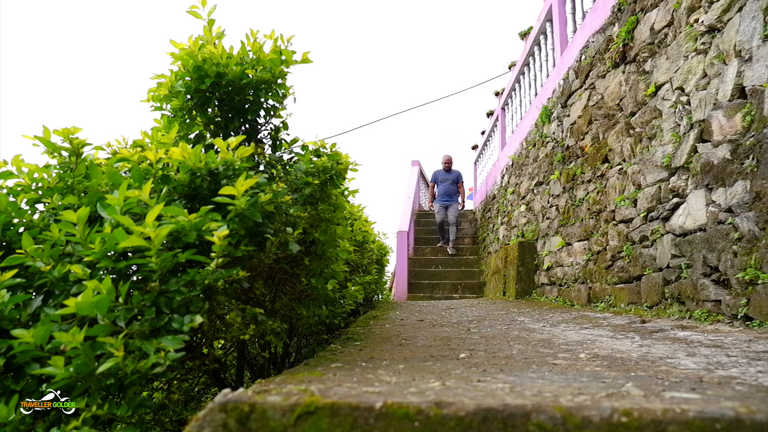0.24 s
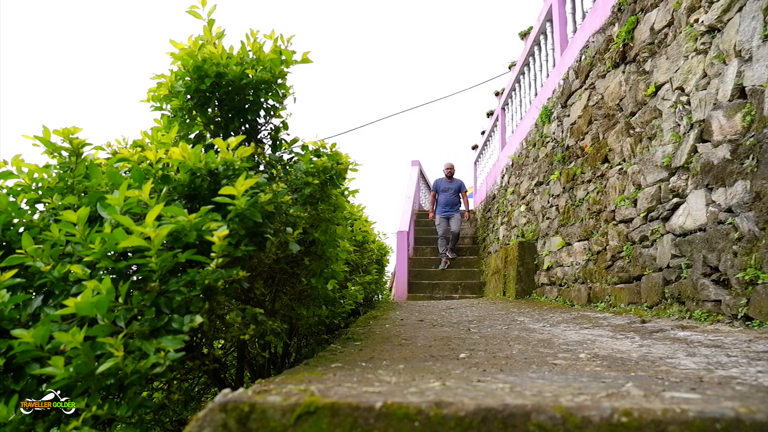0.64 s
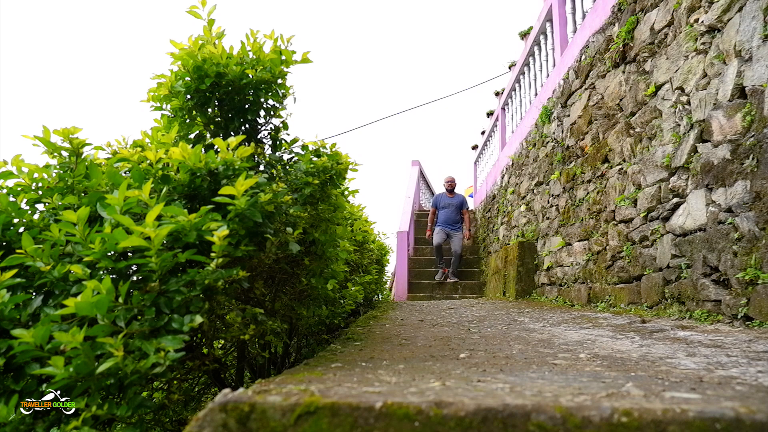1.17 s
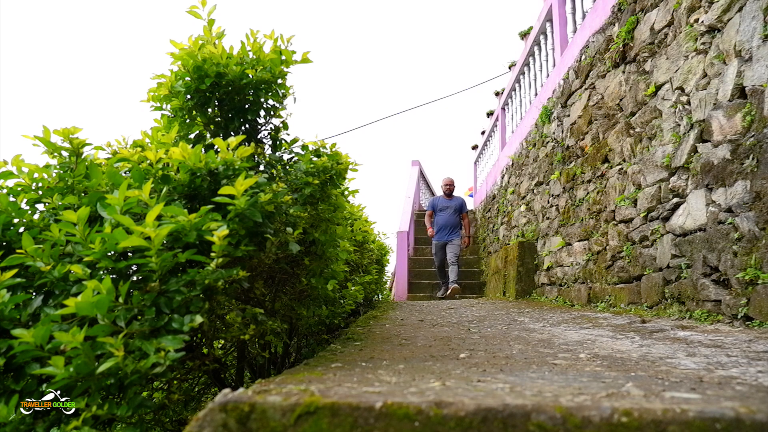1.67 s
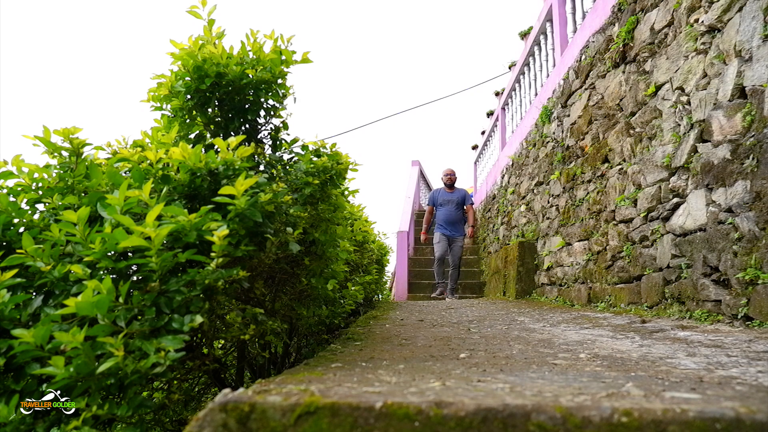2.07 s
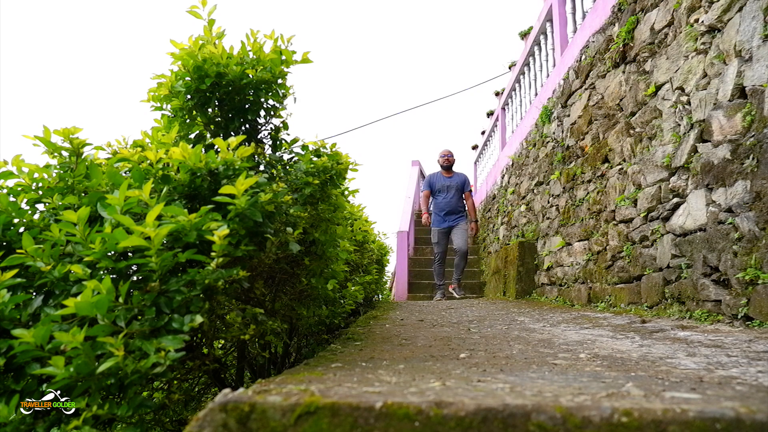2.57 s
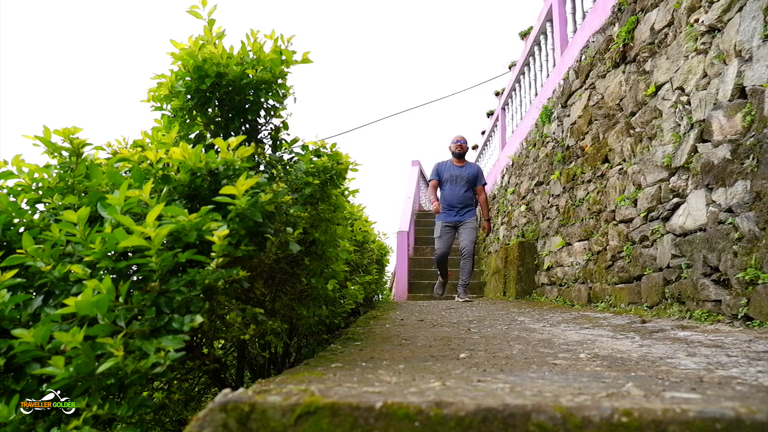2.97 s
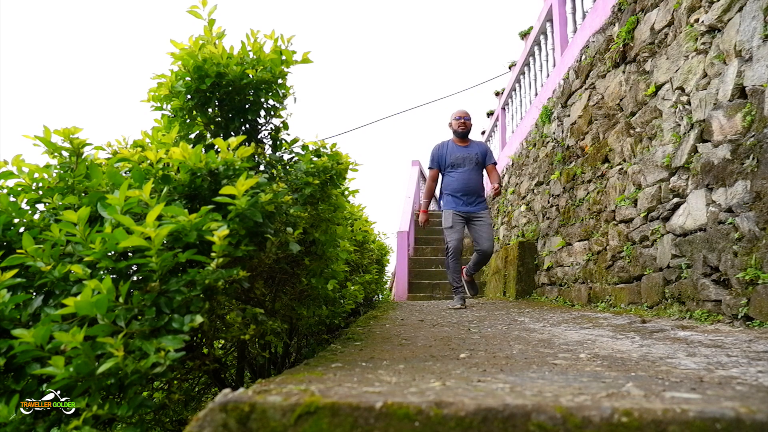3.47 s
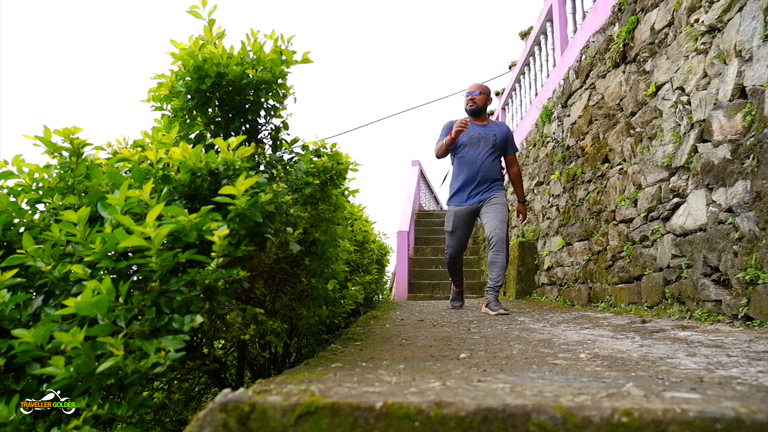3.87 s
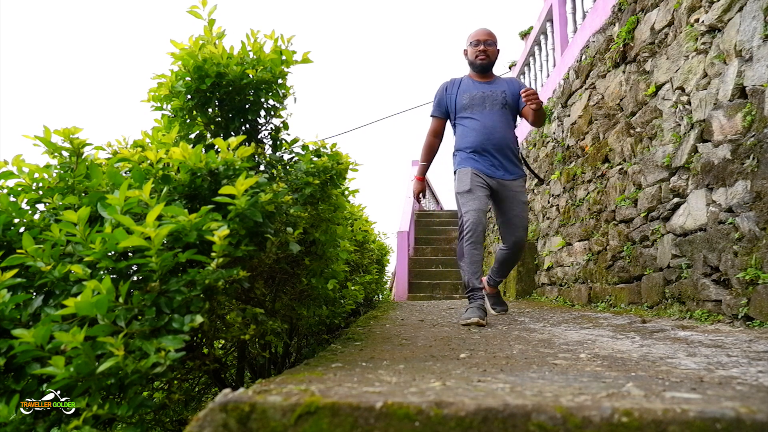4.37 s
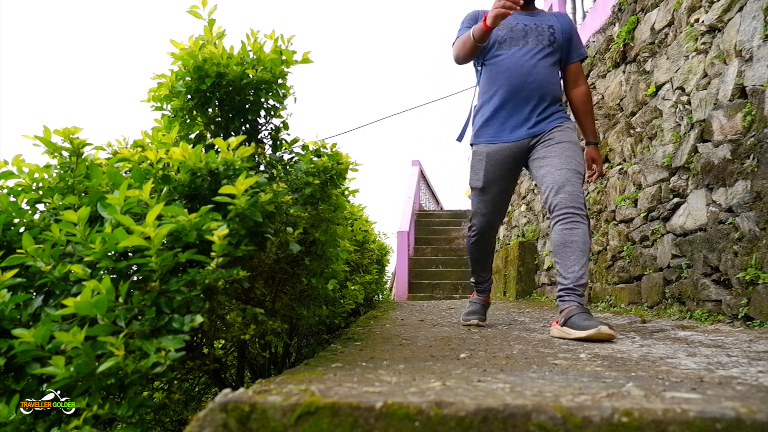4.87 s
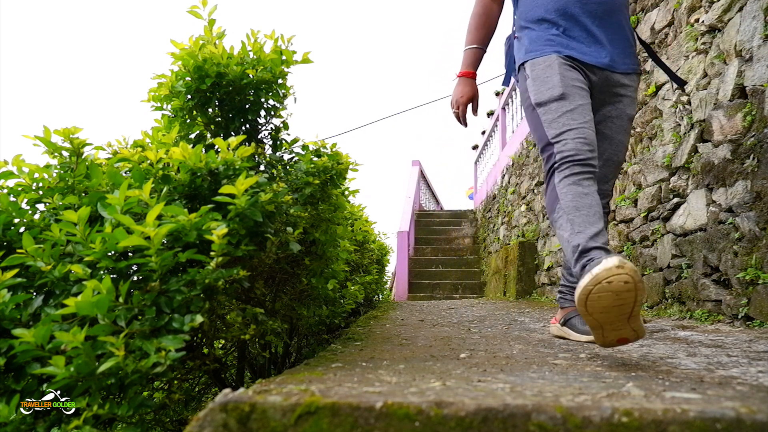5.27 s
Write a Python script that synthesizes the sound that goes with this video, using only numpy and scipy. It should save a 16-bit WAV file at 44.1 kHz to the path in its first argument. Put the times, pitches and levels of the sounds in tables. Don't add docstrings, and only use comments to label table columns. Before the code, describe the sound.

A rasping cicada clicks in rapid, uneven phrases close by, over steadier choruses further off. Sharp heel knocks come down stone steps at a walking pace. About one second in, a cow some way off lows for a second, its voice roughening at the end. The shoes then crunch along gritty concrete towards a microphone on the ground, over soft air rumble, a faint far engine and light hiss.

```python
import sys
import numpy as np
from scipy import signal
from scipy.fft import rfft, irfft
from scipy.io import wavfile
from scipy.ndimage import uniform_filter1d

SR = 44100
rng = np.random.default_rng(int(sys.argv[2]) if len(sys.argv) > 2 else 0)


def bounce(signal):
    frames = np.transpose(np.atleast_2d(signal))
    limited = np.clip(frames, -1, 1)
    pcm = np.round(limited * 32767).astype(np.int16)
    wavfile.write(sys.argv[1], SR, pcm)


def volts_from_db(level):
    exponent = np.asarray(level, float) / 20
    return 10 ** exponent


N = 243413
SEC = np.arange(N) / SR


def level(x, db):
    return x * volts_from_db(db) / np.sqrt(np.mean(x ** 2))


def noise():
    return rng.standard_normal(N)


def colour(x, points):
    hz, db = np.transpose(points)
    f = np.arange(N // 2 + 1) * SR / N + 1
    return irfft(rfft(x) * volts_from_db(np.interp(np.log(f), np.log(hz), db)), N)


def band(x, lo_hz, hi_hz, order=2):
    return signal.sosfilt(signal.butter(order, [lo_hz, hi_hz], "band", fs=SR, output="sos"), x)


def walk(rate_hz):
    k = int(SR / rate_hz)
    steps = np.repeat(rng.standard_normal(N // k + 1), k)
    w = uniform_filter1d(uniform_filter1d(steps, k), k)[:N]
    return w / np.std(w)


def add(out, s, hz, t60, db, rise_s):
    t60 = max(t60, .002)
    t = np.arange(int(t60 * SR)) / SR
    ring = volts_from_db(db - 60 * t / t60) * (1 - np.exp(-t / rise_s)) * np.sin(2 * np.pi * hz * t)
    i = max(int(s * SR), 0)
    out[i:i + len(t)] += ring[:max(N - i, 0)]


def bursts(times, dbs, t60):
    out = np.zeros(N)
    for s, db in zip(times, dbs):
        out += (SEC > s) * volts_from_db(db - 60 * np.clip(SEC - s, 0, 1) / t60)
    return out


def echoes(x, t60, delay_s, db):
    t = np.arange(int(t60 * SR)) / SR
    tail = rng.standard_normal(len(t)) * volts_from_db(-60 * t / t60) * (t > delay_s)
    tail /= np.sqrt(np.sum(tail ** 2))
    return x + volts_from_db(db) * signal.fftconvolve(x, tail)[:N]


# f/Hz, level/dB per Hz
AIR_COLOUR = [(20, -18), (50, -17.5), (100, -11), (200, -9), (400, -16), (900, -16), (1500, -20),
              (3000, -24.5), (5000, -23), (8000, -31), (16000, -50)]
# t/s, level/dB
ENGINE_LEVEL = [(0.0, -81), (0.72, -55), (0.8, -47), (0.89, -53), (2.49, -56.5), (2.6, -73), (2.74, -47.5),
                (2.98, -59), (3.72, -56), (3.95, -47.5), (4.84, -66), (5.04, -50), (5.43, -60), (5.52, -56)]


def village():
    air = level(colour(noise(), AIR_COLOUR), -45) * volts_from_db(1.0 * walk(2.91))
    firing_hz = 86 * (1 + 0.0296 * walk(5))
    engine_db = np.interp(SEC, *np.transpose(ENGINE_LEVEL)) + 1.3 * walk(12)
    engine = np.sqrt(2) * volts_from_db(engine_db) * np.sin(2 * np.pi * np.cumsum(firing_hz) / SR)
    hum = level(band(noise(), 250, 306, order=1), -55)
    return air + engine + hum


def chirps(times, dbs, ribs, detune, shift=1):
    out = np.zeros(N)
    chance = rng.standard_normal((len(times), 3, len(ribs)))
    for s, db, up, c in zip(times, dbs, shift + 0 * times, chance):
        for k, (late, hz, rib_db, t60) in enumerate(ribs):
            click_s = s + late + .0004 * c[0, k]
            click_hz = hz * (up + detune * c[1, k])
            add(out, click_s, click_hz, t60, db + rib_db + 1.1 * c[2, k], rise_s=.0025)
    return out


def chorus(singers, ribs, jitter, scatter_db):
    out = 0
    for rate, db in singers:
        c = rng.standard_normal((int(N / SR * rate * 1.1), 2))
        times = (np.cumsum(1 + jitter * c[:, 0]) - 1) / rate
        one = chirps(times, scatter_db * c[:, 1], ribs, detune=.015)
        out = out + level(one, db) * volts_from_db(1.2 * walk(2.04))
    return echoes(out, t60=.3, delay_s=.003, db=-2)


# delay t/s, f/Hz, level/dB, t60/s
RIBS = [(-.006, 5500, -10, .016), (-.0037, 5170, 1, .017), (0, 4830, 1, .013)]
# delay t/s, f/Hz, level/dB, t60/s
HIGH_RIBS = [(0, 7280, 0, .025), (.003, 6900, -1, .025), (.006, 6500, -5, .025), (.009, 6100, -9, .025)]
# chirp rate/Hz, level/dB
LOW_SINGERS = [(48, -51), (59, -50), (41, -52)]
# chirp rate/Hz, level/dB
HIGH_SINGERS = [(45.2, -63.5), (55.84, -55), (46.5, -53.5)]


def far_cicadas():
    low = chorus(LOW_SINGERS, RIBS, jitter=.05, scatter_db=0.83)
    return low + chorus(HIGH_SINGERS, HIGH_RIBS, jitter=.02, scatter_db=1.2)


def trill():
    out = np.zeros(N)
    for k in range(12):
        add(out, .0125 + k / 47.1, 8010, t60=.025, db=-36, rise_s=0.0021)
    return out


# t/s, pairs, pair to pair t/ms, within a pair t/ms
PHRASES = [(0.007, 2, 40.0, 16), (0.079, 2, 42.0, 16), (0.17, 3, 48.0, 15), (0.297, 3, 42.0, 17),
           (0.42, 7, 50.0, 18), (0.755, 2, 48.0, 15), (0.834, 3, 44.5, 18), (0.976, 3, 40.0, 15),
           (1.105, 3, 41.0, 17), (1.218, 3, 41.0, 16), (1.523, 6, 50.0, 16), (1.815, 3, 49.0, 17),
           (1.943, 7, 41.0, 24), (2.269, 3, 49.0, 17), (2.409, 3, 49.0, 16), (2.547, 5, 41.0, 17),
           (2.751, 2, 50.0, 24), (2.849, 4, 42.0, 18), (3.006, 3, 42.0, 24), (3.146, 3, 41.0, 18),
           (3.26, 4, 46.0, 17), (3.449, 9, 41.0, 24), (3.832, 7, 41.0, 17), (4.136, 2, 48.0, 16),
           (4.24, 13, 41.0, 16), (4.782, 4, 41.0, 16), (4.954, 2, 39.0, 17), (5.045, 8, 41.0, 16),
           (5.39, 3, 45.0, 17)]
LONE_CHIRPS = [.112, .197, .252, .437, .447, .502, .544, .607, .652, .7, 1.349, 1.414, 1.464, 1.506, 1.748,
               1.88, 1.897, 2.028, 2.24, 3.131, 4.373, 4.561, 5.029]
SKIPPED_CHIRPS = [.063, .818, 1.204, 1.523, 1.943, 3.572, 4.256, 4.297, 4.363, 4.379, 4.527, 4.568]
# t/s, body pitch f/Hz, effort level/dB
SINGER_EFFORT = [(0.0, 4900, -0.5), (0.11, 4975, 0.5), (1.35, 4920, 0), (1.47, 5160, -1), (2.3, 4750, -0.5),
                 (3.04, 5034, 1), (4.55, 4720, -0.5), (4.73, 4900, 0), (5.52, 4850, 0.5)]


def near_cicadas():
    phrases = []
    for start, pairs, period_ms, gap_ms in PHRASES:
        offsets_ms = period_ms * np.arange(int(pairs)) + gap_ms * np.arange(2)[:, None]
        phrases.append(start + offsets_ms.ravel() / 1000)
    s = np.concatenate(phrases)
    s = s[np.abs(s[:, None] - SKIPPED_CHIRPS).min(axis=1) > .004] + .002
    dbs = -16.5 + np.r_[0 * s, -1 + np.zeros(len(LONE_CHIRPS))]
    s = np.r_[s, LONE_CHIRPS]
    when, body_hz, effort_db = np.transpose(SINGER_EFFORT)
    dbs += np.interp(s, when, effort_db) + 1.0 * rng.standard_normal(len(s))
    shift = (np.interp(s, when, body_hz) / 4980) ** .5
    return echoes(chirps(s, dbs, RIBS, detune=.006, shift=shift), t60=0.07, delay_s=0.0022, db=-15)


# t/s, pitch f/Hz, level/dB, mouth resonance f/Hz
CALL = [(0.99, 152.1, -38.5, 1030), (1.094, 160.9, -32, 935), (1.382, 171, -32, 880),
        (1.544, 172, -32, 1067), (1.695, 170.7, -31.5, 852), (1.824, 166, -30.5, 934),
        (1.929, 155.1, -29, 956), (2.0, 142.7, -29, 1040), (2.097, 125, -44.5, 1000)]
# f/Hz, level/dB
THROAT_COLOUR = [(400, -19), (560, -7.5), (700, -16), (930, -11), (1150, -12), (1350, -17), (1530, -12),
                 (1850, -15), (2050, -23.5), (2400, -22.5), (2600, -32), (3300, -44)]


def cow():
    s, *columns = np.transpose(CALL)
    hz, call_db, mouth_hz = (np.interp(SEC, s, c) for c in columns)
    onset_s = .06
    start = s[0] - onset_s
    early = np.clip(s[0] - SEC, 0, onset_s)
    hz, call_db = hz - 255 * early, call_db - 199 * early
    rough = np.interp(SEC, [start, 1.28, 1.82, s[-1]], [.32, .12, .12, .8])
    mouth_db = np.clip((hz - 167.5) * 1.1, -12, 0)
    phase = 2 * np.pi * np.cumsum(hz * (1 + 0.032 * rough * walk(70))) / SR
    tremor = walk(90)
    dying_db = -9 * np.clip((SEC - 1.97) / 0.041, 0, 1)
    swell_db = 7.5 * np.clip((hz - 165) / 6, 0, 1)
    hum_db = 9.5 * np.clip((1.09 - SEC) / 0.099, 0, 1)
    first_db = -10 + swell_db + hum_db + dying_db
    gulp_db = 9.5 * np.exp(-((SEC - 1.9) / 0.034) ** 2)
    second_db = -7 + gulp_db + 0.35 * dying_db
    throat_hz, throat_level = np.transpose(THROAT_COLOUR)
    out = 0
    for k in range(1, 20):
        throat_db = np.interp(np.log(k * hz), np.log(throat_hz), throat_level)
        db = throat_db + (k > 7) * mouth_db + 2.6 * walk(8.23)
        boost_db = 16 * np.clip(1 - np.abs(k * hz - mouth_hz) / 183, 0, 1)
        special = {1: first_db, 2: second_db, 3: -6 + db / 3, 5: -15 + boost_db + dying_db, 6: -17 + boost_db}
        db = call_db + special.get(k, db)
        flutter = 1 + rough * np.sqrt(k) * np.roll(tremor, 9000 * k)
        out = out + np.sqrt(2) * volts_from_db(db) * flutter * np.sin(k * phase + k * k)
    out = out * np.interp(SEC, [start - .03, start, s[-1], s[-1] + 0.012], [0, 1, 1, 0])
    high = band(out, 240, 6000)
    return out - high + echoes(high, t60=.75, delay_s=.03, db=-8)


# t of peak/s, body level/dB, low level/dB, sandy level/dB
STAIR_HEELS = [(.08, -50, -35, -61), (.454, -36, -44, -49), (.817, -28, -39, -70), (1.156, -27.5, -53, -62),
               (1.488, -36, -29.5, -70)]
PATH_HEELS = [(3.447, -32.5, -33, -56), (3.936, -28.5, -32.5, -50), (4.439, -27.5, -32.5, -58),
              (4.951, -36, -39, -54), (5.495, -30.5, -28.5, -46)]
ROLLS = [(.158, -57, -39, -56), (.514, -37, -42, -55), (1.526, -45, -55, -67), (1.99, -32, -56, -64),
         (2.945, -25.5, -38, -62), (2.97, -29, -47, -62), (3.508, -23, -26, -60), (3.553, -36.5, -38, -64),
         (4.504, -23, -25.5, -63), (4.72, -43.5, -55, -62), (4.86, -43, -55, -60), (5.055, -35, -46, -52)]
TOE_FLICKS = [(.879, -29, -41, -42.5), (2.527, -34, -47, -59), (3.052, -32, -53, -60),
              (3.667, -45, -58, -68), (4.054, -32.5, -57, -45), (4.472, -28, -34, -54),
              (4.563, -29, -37, -49), (5.001, -21, -38, -57), (5.022, -34.5, -39, -58),
              (5.09, -31, -36, -48)]
SLIDES = [(1.946, -26.5, -40, -75), (4.006, -29, -31.5, -57), (4.984, -34, -35, -49)]
DRAGS = [(1.2, -38, -40, -64), (2.33, -47, -55, -55), (2.441, -35.5, -42, -51), (3.0, -49, -47, -62),
         (4.535, -58, -50, -63)]


def grit():
    struck = rng.standard_normal((4, N)) * (rng.random((4, N)) < 2600 / SR)
    grains = struck * volts_from_db(3 * np.minimum(rng.exponential(size=(4, N)), 3.2))
    grains = (0.96 * grains[3] + grains[:3]) * volts_from_db([2.1 * np.clip(walk(130), -2, 2) for _ in range(3)])
    edges_hz = ((1330, 5400), (316, 1980), (5900, 9700))
    layers = np.array([level(band(g, *hz, order=3), 0) for g, hz in zip(grains, edges_hz)])
    layers[0] = level(layers[0] + 0.53 * band(layers[0], 1170, 2250, order=1), 0)
    far = np.interp(SEC, [1.6, 2.4], [.8, 0])
    layers[0] += far * (0.73 * band(layers[0], 650, 2600) - layers[0])
    movements = [(STAIR_HEELS, 0.0046, 0.016), (PATH_HEELS, 0.0023, 0.046), (ROLLS, 0.023, .018),
                 (TOE_FLICKS, 0.016, .01), (SLIDES, 0.044, 0.021), (DRAGS, 0.03, 0.066)]
    power = np.zeros((3, N))
    for rows, rise, fall in movements:
        for s, *dbs in rows:
            span = slice(int((s - .2) * SR) if s > .2 else 0, int((s + .3) * SR))
            late = SEC[span] - s
            shape_db = -8 * np.where(late < 0, (late / rise) ** 2, late / fall)
            power[:, span] += volts_from_db(shape_db + np.array(dbs)[:, None]) ** 2
    return np.sum(np.sqrt(power) * layers, axis=0)


# t/s, peak level/dB, f/Hz, crack level/dB above the peak
KNOCKS = [(0.073, -11.5, 1194, -21), (0.147, -28, 390, -6), (0.45, -12, 1316, -13.5),
          (0.812, -15, 1304, -10.5), (1.149, -10.5, 1310, -11.5), (1.482, -12, 1550, -12.5),
          (2.404, -26, 3650, -17), (2.466, -20.5, 1113, -9), (2.936, -14, 2060, -12),
          (2.949, -14, 1780, -22), (3.443, -21, 626, -6), (3.49, -17, 1460, -17), (3.5051, -5, 1352, -14),
          (3.931, -21.5, 710, -10), (4.011, -12.5, 3640, -15), (4.055, -16, 1530, -14),
          (4.436, -13, 556, -6), (4.475, -14, 1640, -6.5), (4.496, -7, 993, -20), (4.5, -8.5, 3280, -23),
          (4.509, -15.5, 2260, -8), (4.9479, -19, 485, -3.5), (4.999, -17, 1074, -9),
          (5.03, -23.5, 1180, -8), (5.103, -24.5, 1590, -16), (5.491, -20, 610, -3)]


def knocks():
    out = np.zeros(N)
    for (onset, db, hz, _), c in zip(KNOCKS, rng.standard_normal((len(KNOCKS), 3))):
        s = onset + .0012
        t60 = min(16 / hz, .013) + .003
        add(out, s, hz, t60, db - 0.5, rise_s=0.00027)
        add(out, s + 0.000845, hz * (1.317 + 0.11 * c[0]), t60, db - 4.0, rise_s=0.00036)
        thud_db = (min(db, -11) if hz < 1350 else db - 23) - 12.5
        add(out, s + 0.00196, 320 * (1 + 0.19 * c[1]), .022, thud_db, rise_s=0.00041)
    onset, db, _, crack_db = np.transpose(KNOCKS)
    crack_colour = [(200, 21), (1000, 8), (4000, 3.5), (9000, -10), (16000, -56)]
    return out + bursts(onset + .0012, db + crack_db, t60=0.011) * colour(noise(), crack_colour)


# t/s, level/dB
SPLITTING_STONES = [(3.494, -24), (3.553, -28), (4.437, -20), (4.4456, -14), (4.453, -22), (4.4685, -8),
                    (4.5105, -16), (4.949, -20), (5.031, -24), (5.055, -26), (5.491, -25)]


def snaps():
    return bursts(*np.transpose(SPLITTING_STONES), t60=.008) * band(noise(), 3100, 8100)


# t/s, f/Hz, t60/s, level/dB
SLAB_THUMP = [(3.898, 122, .3, -28)]


def footfalls():
    out = echoes(knocks() + snaps(), t60=.04, delay_s=.002, db=-8)
    out = band(out, 140, 15000)
    add(out, *SLAB_THUMP[0], rise_s=0.003)
    return out


def scene():
    animals = cow() + near_cicadas() + far_cicadas() + trill()
    return np.tile(animals + footfalls() + grit() + village(), (2, 1))


# f/Hz, level/dB per Hz
HISS_COLOUR = [(12, -31), (20, -1), (127, -2.5), (542, 0), (2320, -3.5), (4060, -2), (6010, -3.5),
               (14700, -3.5), (16000, -3.5)]


def port_hiss():
    return [level(colour(noise(), HISS_COLOUR), -47.5) for _ in range(2)]


def low_pass(x):
    return signal.sosfilt(signal.butter(12, 16830, fs=SR, output="sos"), x)


def record(dry):
    top_cut = signal.ellip(10, .2, 80, 15800, fs=SR, output="sos")
    mix = signal.sosfilt(top_cut, dry + port_hiss())
    return low_pass(mix)


dry = scene()
out = record(dry)
bounce(out)
```